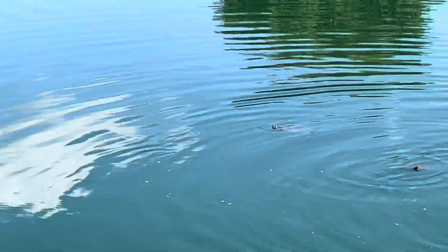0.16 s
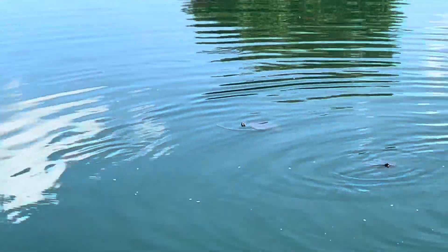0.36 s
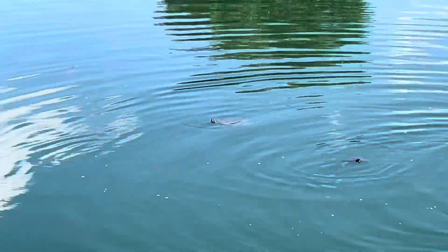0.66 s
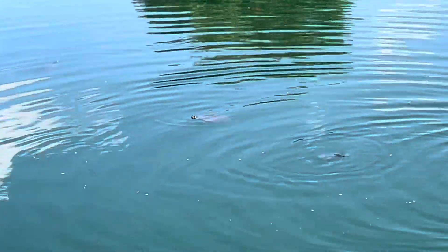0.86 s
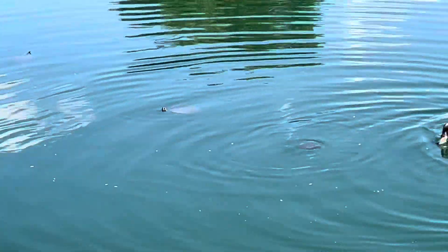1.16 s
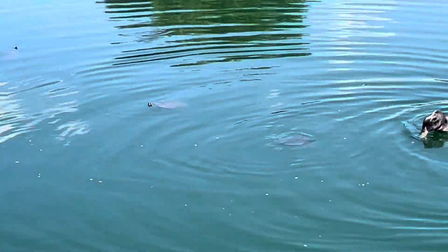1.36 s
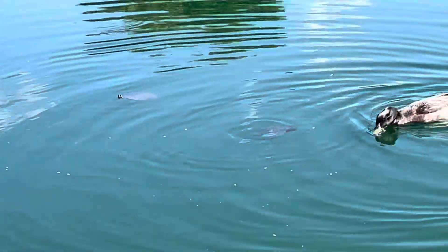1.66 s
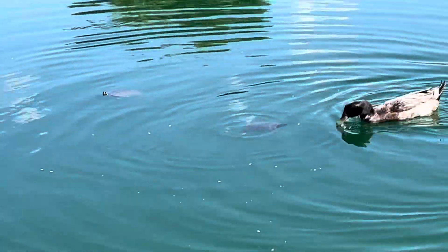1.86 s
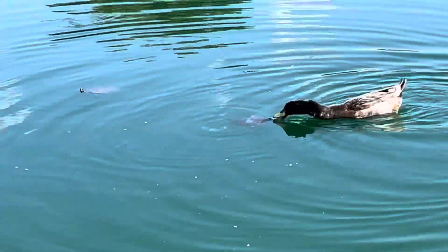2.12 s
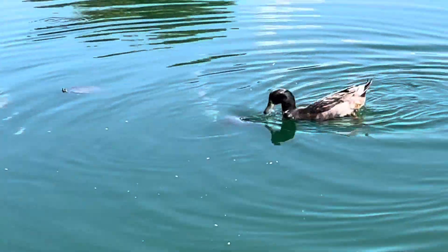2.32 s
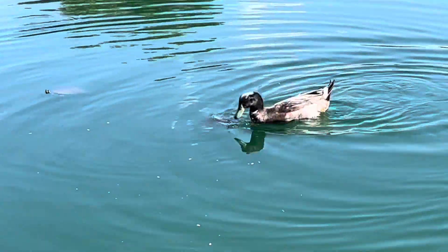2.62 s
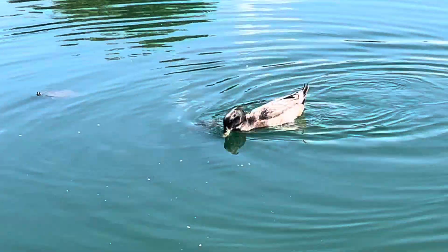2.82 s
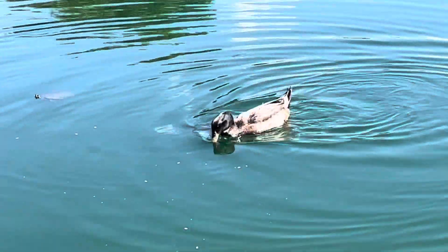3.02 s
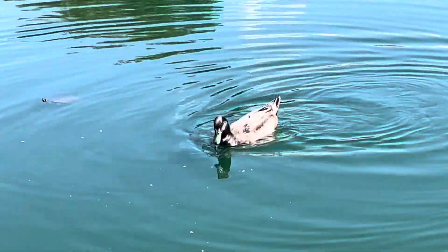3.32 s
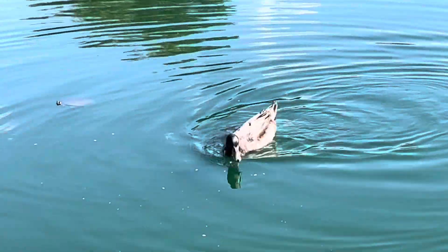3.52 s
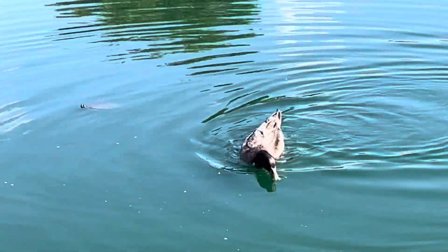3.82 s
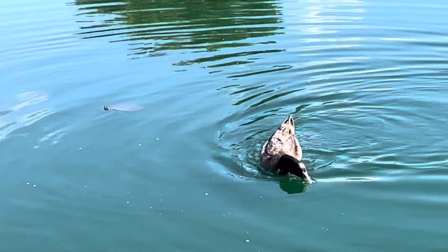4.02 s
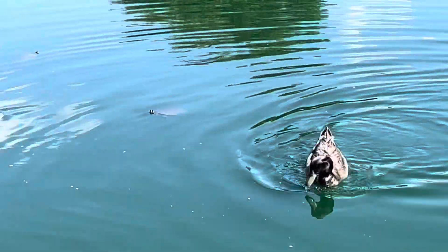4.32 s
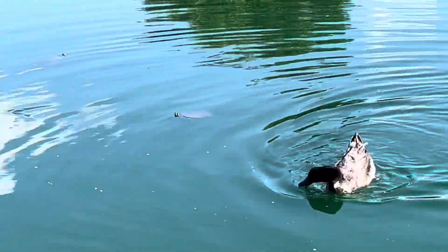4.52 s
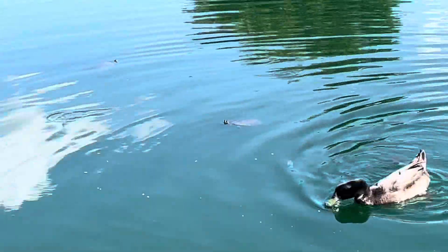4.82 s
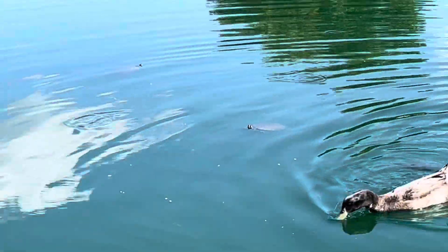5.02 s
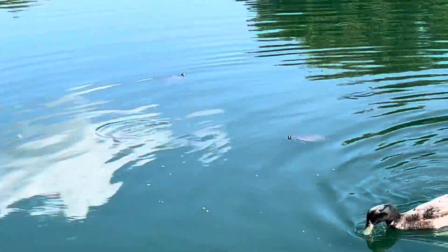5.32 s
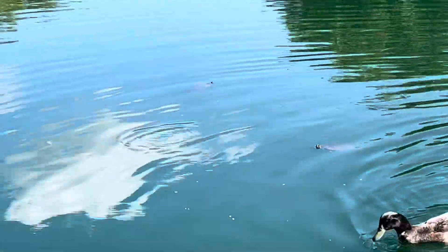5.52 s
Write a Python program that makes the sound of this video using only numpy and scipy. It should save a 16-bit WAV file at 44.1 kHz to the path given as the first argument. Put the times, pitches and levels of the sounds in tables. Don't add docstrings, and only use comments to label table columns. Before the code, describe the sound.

A bright, dense cicada chorus runs throughout, a hissing high buzz centred around five to six kilohertz, shimmering slightly and slowly pulsing. It dips near 0.6 seconds, swells to its fullest around 3.1, sinks near 4.4 and recovers. Wind strikes the handheld phone: soft low thumps in the first second, a lull near 1.0 to 1.4, then thickening buffets from 1.7, with the hardest snapping burst at about 2.5 to 2.7. One short gust follows near 3.2, then calm until light flutter around 5.0. Distant bass rumble and a faint pump hum sit underneath; a second low motor joins at about 3.8. A small bird gives very short chips near 1.2, 2.7 and 4.5, faintly echoed. Tiny bubbly drops from the dabbling duck are sparse, clearest at 4.8 to 5.2. Dry, faint handling ticks occur near 0.45, 1.3, 4.6 and 5.1. The stereo is wide and open, without room reverberation.

```python
import sys
import numpy as np
from scipy import signal
from scipy.fft import rfft, irfft, next_fast_len
from scipy.io import wavfile
from scipy.ndimage import uniform_filter1d

SR = 44100
rng = np.random.default_rng(int(sys.argv[2]) if len(sys.argv) > 2 else 0)


def amp(db):
    return 10 ** (np.asarray(db, float) / 20)


def write(x):
    x = np.atleast_2d(x).T
    wavfile.write(sys.argv[1], SR, np.round(np.clip(x, -1, 1) * 32767).astype(np.int16))


N = 250047
TIME = np.arange(N) / SR
SIZE = next_fast_len(N)
FREQ = np.arange(SIZE // 2 + 1) * SR / SIZE

# (time [s], buffeting level [dB])
GUSTS = [(0.0, -48.5), (0.17, -38.5), (0.33, -43), (0.45, -50.5), (1.04, -45.5), (1.4, -49.5),
         (1.75, -40.5), (2.2, -36.5), (2.45, -34.5), (2.7, -28), (2.8, -43), (3.13, -50.5), (3.25, -30.5),
         (3.4, -48), (3.52, -62), (4.7, -49.5), (4.95, -36.5), (5.25, -50)]
CALM_DB = -45


def unit(x):
    return x / np.sqrt(np.mean(x ** 2))


def curve(table):
    s, level = np.transpose(table)
    return np.interp(TIME, s, level)


def walk(rate):
    hold = int(SR / rate)
    steps = np.repeat(rng.standard_normal(N // hold + 1), hold)
    return 1.47 * uniform_filter1d(uniform_filter1d(steps, hold), hold)[:N]


def colour(x, table):
    hz, db = np.transpose(table)
    spectrum = rfft(x, SIZE) * amp(np.interp(np.log(FREQ + 1), np.log(hz), db))
    return spectrum / np.sqrt(np.mean(irfft(spectrum, SIZE) ** 2))


def band(spectrum, centre_hz, octaves):
    away = np.clip(np.log2((FREQ + 1) / centre_hz) / octaves, -1, 1)
    return irfft(spectrum * np.cos(np.pi / 2 * away) ** 2, SIZE)[:, :N]


def add(out, start_s, sound):
    i = int(start_s * SR)
    out[0, i:i + len(sound)] += sound[:N - i]


def cicadas():
    # (time [s], level [dB])
    chorus_swell = [(0.0, -46.5), (0.08, -47.5), (0.6, -50), (0.77, -48), (1.8, -45.5), (2.59, -45),
                    (3.13, -42), (4.01, -44.5), (4.4, -50), (5.32, -48), (5.57, -46.5), (5.67, -46)]
    # (frequency [Hz], density [dB per Hz])
    body_resonance = [(2500, -34), (3100, -23), (3900, -10.5), (4700, -6), (5500, 0.0), (6100, -1.8),
                      (6900, -8.5), (7600, -16.5), (8400, -19.5), (9300, -28.5), (11500, -28), (12600, -31),
                      (13700, -37), (15500, -41)]
    clicks_per_s = 22000
    throb_s, throb_peak_s, throb_db = .87, .2, 1.5
    level_db = uniform_filter1d(curve(chorus_swell), SR // 10)
    round_db = throb_db * np.cos(2 * np.pi * (TIME - throb_peak_s) / throb_s)
    chance = rng.random((2, 2, N))
    strength = amp(-1.2 * np.log(chance[1] + 1e-9))
    clicks = (chance[0] < clicks_per_s / SR) * strength * rng.choice([-1, 1], (2, N))
    song = colour(clicks, body_resonance)
    out = 0
    for hz in 2000 * 2 ** np.arange(0, 3.3, .25):
        share = np.exp(-(np.log(hz / 6900) / 0.31) ** 2)
        waver_db = 0.13 * walk(2.94) + 0.62 * walk(13.0)
        out = out + band(song, hz, octaves=.25) * amp(share * share * 0 + share * round_db + waver_db)
    return unit(out) * amp(level_db + 7.5)


def eddy(hz, peak_db, cycles):
    cycles = max(cycles, .4) * max(hz / 280, 1) ** 1.5
    t = np.arange(int(4 * cycles * SR / hz)) / SR
    envelope = np.exp(-((t * hz - 1.16 * cycles) / cycles) ** 2)
    return amp(peak_db) * np.sin(2 * np.pi * hz * t) * envelope


def wind():
    # (time [s], peak [dB], pitch [Hz])
    thumps = [(0.026, -31, 129), (0.143, -27, 79), (0.226, -38, 110), (0.318, -26, 84), (0.598, -35, 112),
              (0.742, -22.5, 104), (0.829, -34, 94.2), (1.333, -39, 70.0), (1.45, -31, 106),
              (1.512, -26.5, 157), (1.637, -33, 162), (1.742, -24.5, 131), (1.891, -26, 91.5),
              (1.952, -24, 91.5), (2.022, -22, 121), (2.091, -27, 83.4), (2.176, -25, 78.6),
              (2.24, -21.5, 129), (2.357, -20, 75), (2.471, -23, 101), (2.522, -21.5, 73.4),
              (2.675, -21, 94), (2.777, -33.5, 68), (2.888, -27, 64), (2.987, -32.5, 147),
              (3.188, -30, 155), (4.323, -30.5, 95), (5.009, -29.5, 142), (5.128, -36, 73),
              (5.468, -37, 170)]
    # (time [s], peak [dB], pitch [Hz])
    snaps = [(0.055, -36, 297), (1.271, -35.5, 290), (1.743, -27, 225), (2.175, -27.5, 262),
             (2.235, -32, 400), (2.297, -25, 250), (2.44, -31, 258), (2.47, -19.5, 233),
             (2.498, -25.5, 290), (2.532, -10.5, 269), (2.564, -24.5, 362), (2.627, -19.5, 224),
             (2.65, -37, 221), (2.674, -30, 276), (2.615, -32, 560), (2.68, -31.5, 520), (2.711, -27, 256),
             (3.189, -36, 317), (3.195, -42, 560), (3.315, -38.5, 535), (4.015, -45, 266)]
    # (centre [Hz], width [octaves], level [dB], dB per dB of buffeting, lumpiness [dB])
    ranges = [(73.4, 1.43, -3.0, 0.91, 4.3), (170, 1.26, -8.5, 0.8762, 1.75), (356, 1.5, -16.0, .5, 4.7)]
    wake_db, wake_s = -10, 0.038
    wake = sum(amp(db + wake_db) * np.exp(-((TIME - s - wake_s / 2) / wake_s) ** 2) for s, db, hz in thumps)
    buffet_db = 20 * np.log10(np.hypot(amp(curve(GUSTS)), wake))
    lumps = np.tanh(walk(40.0))
    out = np.zeros((2, N))
    for hz, octaves, db, follow, lumpy_db in ranges:
        noise = rfft(rng.standard_normal((2, N)), SIZE)
        eddies = band(noise, hz, octaves) * amp(lumpy_db * lumps)
        out += unit(eddies) * amp(CALM_DB + follow * (buffet_db - CALM_DB) + db)
    for events, trim_db, cycles in [(thumps, -2.5, 0.83), (snaps, -1.5, 0.43)]:
        for s, db, hz in events:
            add(out, s, eddy(hz, db + trim_db, cycles - 0.0035 * (db + 30)))
    return out


def bird():
    # (time [s], length [s], peak [dB], start frequency [Hz], end frequency [Hz])
    chips = [
        (1.199, .012, -47, 3650, 3150),
        (1.236, 0.024, -44, 3150, 3460),
        (2.703, .014, -48, 3450, 3100),
        (2.737, 0.023, -43, 3200, 3430),
        (4.498, .012, -52, 3500, 3200),
        (4.536, 0.018, -46, 3170, 3400),
        (4.108, .012, -50, 3300, 3050),
    ]
    echo_s, echo_db = .045, -14
    out = np.zeros((2, N))
    for s, length_s, db, from_hz, to_hz in chips:
        along = np.arange(int(length_s * SR)) / (length_s * SR)
        pitch_hz = from_hz + (to_hz - from_hz) * along ** 0.73
        envelope = (.5 + .5 * along) * np.sin(np.pi * along) ** 0.18
        breath = 1 + uniform_filter1d(rng.standard_normal(len(along)), size=150)
        chip = amp(db) * np.sin(2 * np.pi * np.cumsum(pitch_hz) / SR) * envelope * breath
        add(out, s, chip)
        add(out, s + echo_s, amp(echo_db) * chip)
    return out


def drops():
    # (time [s], peak [dB], bubble frequency [Hz], ring [s], upward glide [share])
    bubbles = [(1.126, -56.5, 2450, 0.0093, 0.09), (3.861, -56, 1910, 0.012, 0.12),
               (4.169, -51, 1680, 0.0065, 0.12), (4.300, -56.5, 1570, 0.013, 0.092),
               (4.759, -63, 2300, 0.013, 0.29), (4.8172, -46.5, 2090, 0.008, 0.044),
               (4.8228, -39, 2070, 0.0033, 0.059), (4.8244, -45, 1100, 0.0038, 0.044),
               (4.859, -54, 2500, .01, 0.08), (4.963, -48.5, 1044, 0.026, 0.076),
               (4.979, -48, 2740, 0.011, 0.063), (4.979, -44, 875, 0.0047, 0.085),
               (5.169, -40.5, 2690, 0.01, 0.059)]
    out = np.zeros((2, N))
    for s, db, hz, ring_s, glide in bubbles:
        t = np.arange(int(ring_s * SR)) / SR
        pitch_hz = hz * (1 + glide * (3 * t / ring_s - .5))
        envelope = np.minimum(t / 0.00057, 1) * np.exp(-np.log(1000) * t / ring_s)
        add(out, s, amp(db + 15.5) * np.sin(2 * np.pi * np.cumsum(pitch_hz) / SR) * envelope)
    return out


def grip():
    # (time [s], peak [dB], frequency [Hz])
    ticks = [
        (.4548, -36, 13000),
        (.4548, -46, 15600),
        (1.297, -46, 15600),
        (4.571, -37, 15200),
        (4.824, -52, 12500),
        (5.095, -44, 15600),
    ]
    out = np.zeros((2, N))
    t = np.arange(60) / SR
    for s, db, hz in ticks:
        add(out, s, amp(db) * np.sin(2 * np.pi * hz * t) * np.exp(-t / 0.00016))
    return out


def far_levels():
    stir_db = uniform_filter1d(curve(GUSTS), int(0.15 * SR)) - CALM_DB
    duck = uniform_filter1d(1. * (TIME > 2.78) * (TIME < 3.68), SR // 10)
    return stir_db, -47 + 0.04 * stir_db - 3.5 * duck


def machines():
    # (multiple of the turning rate, level over the rumble [dB])
    pump_harmonics = [(2, -7.5), (3, -11.5), (4, -9), (5, -9.5), (6, -11), (7, -13), (8, -21), (9, -27)]
    # (frequency [Hz], level [dB])
    motor_lines = [(177.6, -49), (253, -53), (350, -60)]
    pump_hz, motor_start_s = 58.9, 3.77
    stir_db, level_db = far_levels()
    pump_db = 1.0 - 0.18 * np.maximum(stir_db, 0)
    turn = 2 * np.pi * np.cumsum(1 + 0.0012 * walk(2.924)) / SR
    hum = 0
    for k, db in pump_harmonics:
        hum = hum + amp(db + 1.8 * walk(12.0)) * np.sin(k * pump_hz * turn + 2 * np.pi * rng.random())
    motor = sum(amp(db + 1.0 + 3.37 * walk(12.0)) * np.sin(hz * turn) for hz, db in motor_lines)
    out = np.zeros((2, N))
    out[0] = hum * amp(level_db + pump_db) + motor * np.clip((TIME - motor_start_s) / 0.18, 0, 1)
    return out


def rumble():
    # (frequency [Hz], density [dB per Hz])
    far_spectrum = [(24, -17.5), (40, 0.5), (167, -1.5), (212, -6.5), (355, -6), (661, -18.5), (972, -18),
                    (1430, -24.5), (2140, -24), (2430, -27.5), (2660, -31), (2920, -29), (3200, -33.5),
                    (4160, -73), (7040, -120)]
    stir_db, level_db = far_levels()
    deep_db = 0.62 * stir_db
    air = colour(rng.standard_normal((2, N)), far_spectrum)
    swell, out = walk(0.96), 0
    for hz in 40 * 2 ** np.arange(0, 7, .5):
        trend_db = deep_db if hz < 130 else level_db if hz < 600 else 0 * stir_db
        flicker_db = .4 * swell + 1.2 * walk(8.0)
        out = out + band(air, hz, octaves=.5) * amp(trend_db - trend_db.mean() + flicker_db)
    return out * amp(level_db.mean() + 2.0)


def scene():
    # (frequency [Hz], left lead [rad], left minus right [dB], unshared part [share 0-1])
    port_pair = [(40, 0.0, 0.0, .02), (300, -.3, 0.0, .1), (620, -1.0, -2.5, .3), (900, -.1, 1.0, .25),
                 (1700, -.3, 2.5, .25), (2670, 2.5, 0.5, .25), (3700, .9, 0.0, .12), (5000, 1.45, 0.0, .1),
                 (5850, 3.14, 0, .04), (8100, 6.28, 0, .05), (10250, 9.42, 0, .08), (12400, 12.56, 0, .05),
                 (14700, 15.7, 0, .1)]
    shared, twin = rfft(cicadas() + wind() + bird() + drops() + grip() + machines() + rumble(), SIZE)
    hz, *columns = np.transpose(port_pair)
    lead, pan_db, apart = (np.interp(FREQ, hz, c) for c in columns)
    apart = np.clip(apart, 0, 1) / 2
    side = np.array([[1], [-1]])
    mixed = np.sqrt(1 - apart) * shared + side * np.sqrt(apart) * twin
    heard = mixed * np.exp(.5j * side * lead) * amp(side * pan_db / 2)
    return irfft(heard, SIZE)[:, :N]


def joint_stereo(x):
    # (frequency [Hz], masking threshold [dB], rounding step [dB])
    masking = [(700, -60, -37), (1100, -40, -31), (1900, -30.5, -28), (2700, -31, -27), (4000, -28, -23),
               (5300, -22, -20), (5950, -8, -20), (6800, -22, -22), (7900, -20, -25), (8600, -27, -27),
               (9300, -32, -30), (10300, -34, -32), (12100, -33, -31), (13000, -34.5, -31),
               (14300, -38.5, -32), (15000, -39.5, -32), (15700, -37.5, -32)]
    hop, grid = 1024, 577
    edges = np.r_[0:40:4, 40:96:8, 96:144:12, 144, 160, 176, 196, 216, 240, 264, 292, 320:960:32, 1024]
    width = np.diff(edges)
    lead_in = 2 * hop - grid
    count = N // hop + 4
    pair = np.array([x[0] + x[1], x[0] - x[1]]) / 2
    pair = np.pad(pair, ((0, 0), (lead_in, (count + 1) * hop - N - lead_in))).astype(np.float32)
    n, k = np.arange(2 * hop) + .5 + hop / 2, np.arange(hop) + .5
    window = signal.windows.kaiser_bessel_derived(2 * hop, 4 * np.pi)[:, None]
    basis = window * np.cos(np.pi / hop * np.outer(n, k)) * np.sqrt(2 / hop)
    basis = basis.astype(np.float32)
    halves = pair.reshape(2, -1, hop)
    lines = np.concatenate([halves[:, :-1], halves[:, 1:]], axis=2) @ basis
    power_db = 10 * np.log10(np.add.reduceat(lines ** 2, edges[:-1], axis=2) / width + 1e-18)
    centre_hz = (edges[:-1] + edges[1:]) * SR / 4 / hop
    loudest_db = uniform_filter1d(power_db[:, :, centre_hz > 3000].max(axis=(0, 2)), size=3)[:, None]
    loudest_db = loudest_db + .8 * uniform_filter1d(rng.standard_normal((count, 1)), size=4, axis=0)
    hz, *columns = np.transpose(masking)
    mask_db, step_db = (loudest_db + np.interp(centre_hz, hz, c) + rng.standard_normal(power_db.shape)
                        for c in columns)
    pair_db = np.array([-1.2, -2.8])[:, None, None]
    rival_db = power_db[::-1] + pair_db + 1.5 * rng.standard_normal(power_db.shape)
    weaker = (power_db < rival_db) & (centre_hz > 8000)
    mask_db = np.where(weaker, np.maximum(mask_db, power_db + 3), mask_db)
    masked = (power_db < mask_db) & (centre_hz > hz[0])
    step = np.repeat(amp(np.where(masked, mask_db + 11, step_db)), width, axis=2)
    rounded = np.floor(np.abs(lines / step) ** .75 + .4054) ** (4 / 3)
    frames = (np.sign(lines) * rounded * step).astype(np.float32) @ basis.T
    halves = np.pad(frames[:, :, :hop], ((0, 0), (0, 1), (0, 0)))
    halves = halves + np.pad(frames[:, :, hop:], ((0, 0), (1, 0), (0, 0)))
    mid, side = halves.reshape(2, -1)[:, lead_in:lead_in + N]
    return np.array([mid + side, mid - side], dtype=float)


def low_pass(x):
    return signal.sosfilt(signal.butter(12, 15750, fs=SR, output="sos"), x)


def record(dry):
    cut = signal.sosfilt(signal.butter(2, 38, "high", fs=SR, output="sos"), dry)
    cut = signal.sosfilt(signal.ellip(8, .2, 70, 15750, fs=SR, output="sos"), cut)
    mix = joint_stereo(cut)
    return low_pass(mix)


dry = scene()
out = record(dry)
write(out)
```